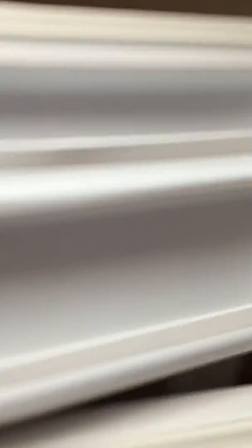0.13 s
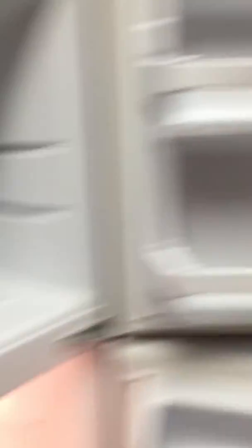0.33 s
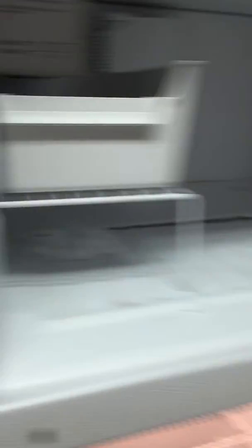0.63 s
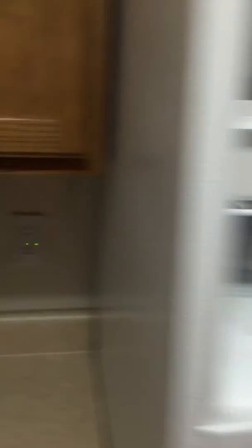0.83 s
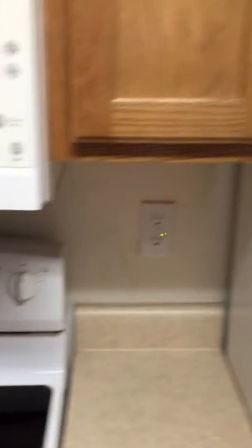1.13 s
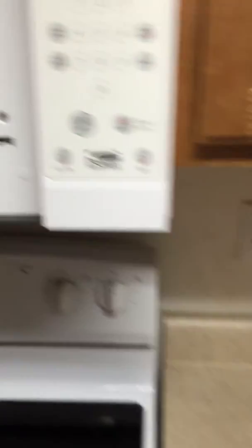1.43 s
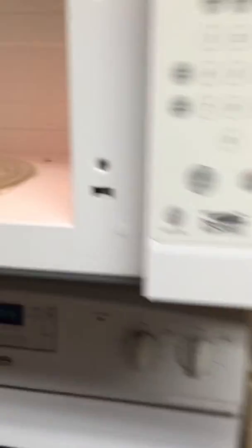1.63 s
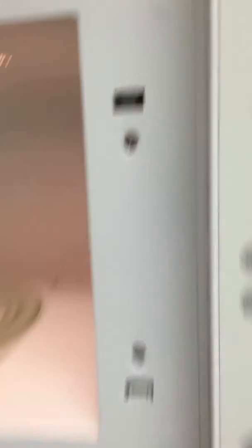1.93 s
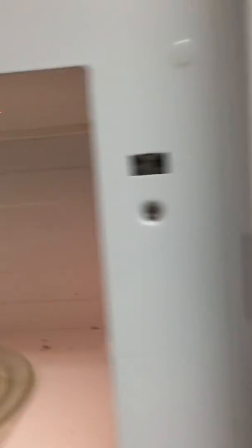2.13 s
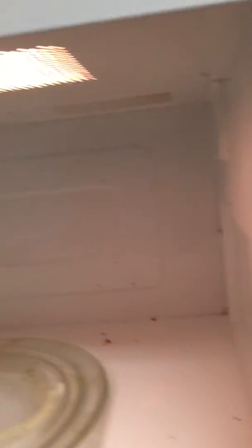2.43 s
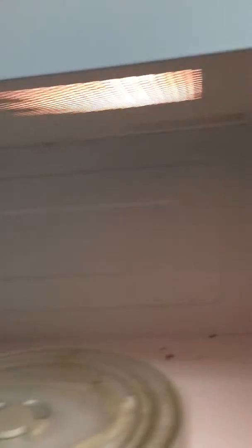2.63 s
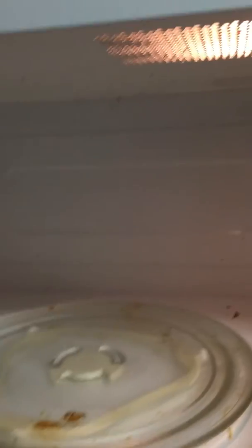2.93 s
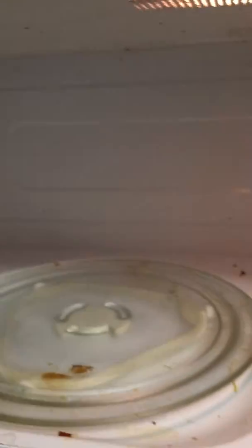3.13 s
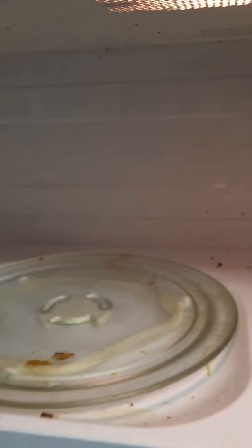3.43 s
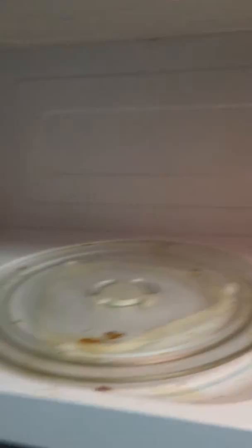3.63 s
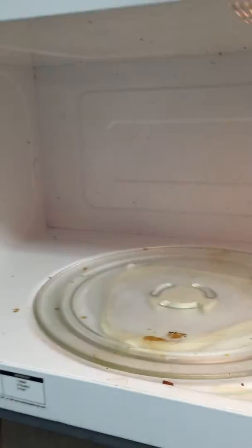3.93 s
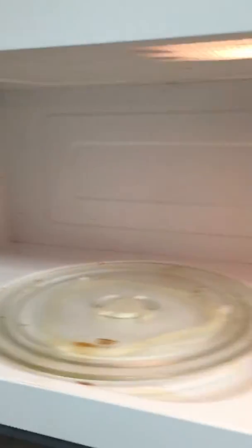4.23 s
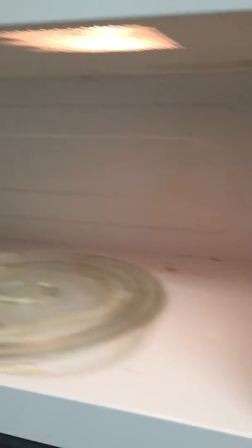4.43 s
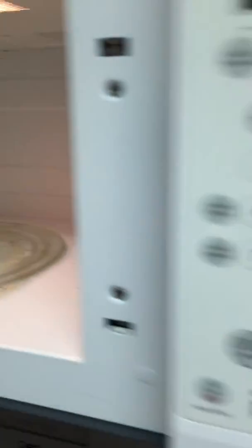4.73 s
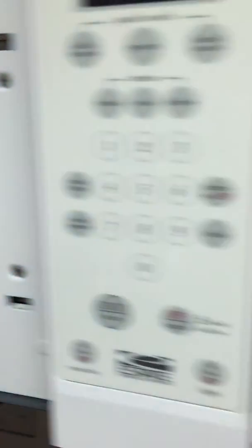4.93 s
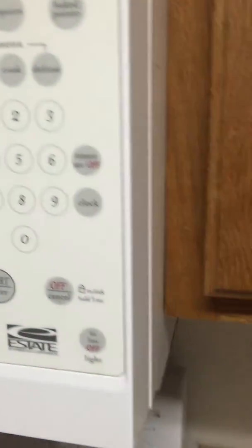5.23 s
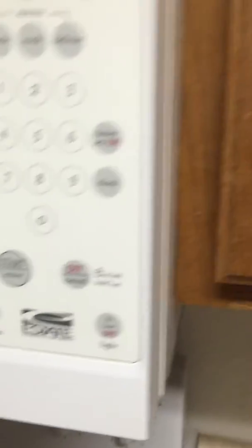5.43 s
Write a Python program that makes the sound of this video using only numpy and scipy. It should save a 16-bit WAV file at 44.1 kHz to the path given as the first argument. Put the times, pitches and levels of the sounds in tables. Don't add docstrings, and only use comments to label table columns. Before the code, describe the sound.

A small handheld microphone moves through a bare, reflective kitchen. At first an open running refrigerator is near: a low, slowly beating compressor hum, hollow drone and breathy fan hiss, with soft floor rumble. At 0.75 s a hollow shelf is knocked and rings briefly; at 0.94 s a heel lands with a sharp click and airy scuff. From about 1.2 s the fan fades. A tiny spring ping and close tick come at 1.6 s, faint squeaks near 1.9 s, a latch snap with quick rebounds at 2.15 s and a duller click at 2.36 s. A toe tap at 2.96 s brings a low floor creak. Quiet hum and muffled treads follow, with a soft heel at 4.78 s. The drone swells near 5.1 s. At 5.33 s the seal touches, then at 5.35 s the door slams extremely loudly, rebounding, with deep thud, panel ring, shelf rattle and short echo.

```python
import sys
import numpy as np
from scipy import signal
from scipy.fft import rfft, irfft
from scipy.io import wavfile
from scipy.ndimage import uniform_filter1d

SR = 44100
rng = np.random.default_rng(int(sys.argv[2]) if len(sys.argv) > 2 else 0)


def store_pcm(level_fs):
    pcm = np.round(np.clip(level_fs, -1, 1) * 32767).astype(np.int16)
    wavfile.write(sys.argv[1], SR, np.atleast_2d(pcm).T)


def convert_level_to_amplitude(level_db):
    exponent = np.asarray(level_db, float) / 20
    return 10 ** exponent


N = 245637

# (frequency [Hz], density [dB per Hz])
STILL = [(240, -25), (400, -10), (432, -4), (459, -16), (481, -9), (527, -10), (673, -1), (726, -1.5),
         (761, -23), (1170, -4.5), (2030, -31.5), (2920, -27), (3250, -25), (5480, -27.5), (15500, -33.5)]
STILL_DB = -66.5
# (frequency [Hz], density [dB per Hz])
FAN = [(240, -22), (400, -14), (438, -7.5), (466, -35), (586, -2), (663, -11.5), (1050, -6), (2090, -10.5),
       (3510, -20.5), (4630, -29.5), (11400, -34.5), (15500, -39)]
# (frequency [Hz], density [dB per Hz])
DRONE = [(76, -25), (130, -9.5), (268, 4), (396, -3.5), (422, -25), (537, -8.5), (602, -19.5), (826, -16.5),
         (907, -12.5), (1060, -15.5), (1600, -24.5), (2080, -48), (3520, -120)]
# (frequency [Hz], density [dB per Hz])
RUMBLE = [(15, -54), (25, -8), (42, -9), (62, -9), (75, -0.5), (124, 3.5), (136, -2), (146, -7), (161, -24),
          (200, -31), (260, -43), (440, -120)]
RUMBLE_DB = -56.5
# (time [s], level over the rest [dB], half length [s])
TREADS = [
    (.05, 10, 0.31),
    (.78, 13, .07),
    (0.933, 9, 0.043),
    (2.05, 4, 0.22),
    (3.067, 5, .1),
    (3.4, 12.5, .12),
    (4.78, 9.5, .06),
    (5.04, 10, 0.054),
    (5.3, 5, .08),
]
# (time [s], drone level by nearness [dB], fan level by view into the open door [dB])
WALK = [(0.0, -52.5, -54.5), (0.25, -51, -54.5), (0.53, -48, -51.5), (0.83, -47.5, -50), (1.26, -50.5, -59),
        (1.48, -54, -62), (1.72, -54.5, -62.5), (2.09, -54, -64.5), (2.55, -58.5, -68),
        (3.01, -59.5, -67.5), (3.96, -60.5, -66), (4.42, -57.5, -66), (5.07, -50.5, -65.5),
        (5.32, -53, -63)]

# (frequency [Hz], level [dB])
HUM = [(54.1, 0.5), (59.0, 5), (108.3, -2.5), (119.9, 0)]
HUM_DB, HUM_FOLLOWS, NEAR_DB = -55.5, 0.54, -50.5
BEAT_S, CREST_S = 0.58, 0.3
NODES_S = 2.4
SHAFT_HZ = 54.43
# (order [1], level against the drone [dB])
SHAFT_ORDERS = [(3, -14), (4, -8), (5, -3.5), (7, -13.5), (8, -12.5), (9, -13), (10, -15.5), (12, -30)]
# (frequency [Hz], width [Hz], level [dB], loudest at [s], span [s])
RESONANCES = [(1057, 16, -73, 1.6, 1.1), (661, 21, -71, 2.11, 0.37), (431.2, 6.6, -68, 0.28, 0.89),
              (5500, 110, -94.5, 2, 5.9),
              (82.4, 6, -64.5, 2.93, 0.64), (191, 73, -65.5, 0.59, 1), (121, 26, -73, 3.8, 0.41),
            (225.2, 10.3, -67.5, 1.55, 0.88), (380.4, 21, -71.5, 3.3, 0.75)]
WALL_S, WALL_SWAY_S, WALL_SHARE = 0.0011, 0.0003, 0.2

# (frequency [Hz], t60 [s])
KITCHEN = [(100, 0.98), (300, 0.68), (1000, 0.42), (3000, 0.37), (8000, 0.33), (15000, 0.28)]

# (time [s], level [dB])
SNAPS = [
    (.939, -52),
    (1.595, -62),
    (2.146, -55),
    (2.361, -63),
    (2.955, -54),
]
# (frequency [Hz], level [dB])
SNAP = [(500, -30), (800, 0), (3000, 3), (8000, -6), (15000, -3)]
# (frequency [Hz], level [dB], t60 [s])
SHELF = [(217, -7.5, .2), (289, -9.5, 0.17), (374.6, -1.5, 0.52), (442, -1, 0.094), (546, -5, 0.085),
         (698, -6.5, 0.15), (766, -8, 0.14)]
SHELF_S, SHELF_DB = 0.746, -26
SHELF_FREE_S, SHELF_MUTE_S = 0.054, 0.012
# (frequency [Hz], level [dB], t60 [s])
STEP = [(231.5, 7.5, 0.12), (210, 5, 0.13), (172, -0.5, 0.26)]
STEP_S, STEP_DB = 2.958, -36
CONTACT_S = 0.0006

# (frequency [Hz], level [dB], t60 [s], spread [octaves], room level [dB])
SHELF_EDGE = [(2337, -2, 0.03, 0.19, -13.5), (4200, -14, 0.035, 0.61, -6.5), (1190, -10.5, 0.069, 0.9, -4),
              (10300, -25.5, 0.058, 0.54, -9)]
HEEL = [(1346, -5, 0.024, 0.1, -9), (1735, -1, 0.015, 0.15, -12), (2450, -0.5, 0.016, 0.12, -10),
        (3820, -14.5, 0.014, 0.1, -7)]
LATCH = [(1710, 0.5, 0.033, 0.5, -1), (2390, -5.5, 0.027, 0.29, -7), (3320, -10.5, 0.073, 0.4, 2),
         (6400, -16, 0.036, 0.47, 2)]
SPRING = [(4370, 0, 0.023, 0.089, -8), (6200, -11, .03, .25, -1), (1510, 6, .03, .1, -5)]
TOE = [(1730, 1, 0.038, 0.23, -6.5), (2160, -3.5, 0.038, 0.23, -13), (3460, -9, 0.065, 0.17, -15),
       (5640, -11.5, 0.049, 0.19, -12), (840, -11, 0.052, 0.31, -15)]
TICK = [(2050, 0, .011, .06, -9), (1625, -7, .015, .1, -8)]
# (time [s], level [dB], pitch factor [1], extra room level [dB], dullness [dB per octave])
SHELF_EDGE_AT = [
    (.7440, -15.5, 1.0, 0.8, 0.5),
]
HEEL_AT = [
    (.9385, -20, 0.99, -0.82, 0.033),
    (4.7805, -39.5, .95, 1.7, 1),
]
LATCH_AT = [
    (2.1453, -32, 0.97, -0.12, 0.5),
    (2.151, -38, 1.08, 0.1, 1.5),
    (2.163, -41.5, 1.15, 0.1, 0.5),
    (2.360, -44, 0.96, -1.8, 3.4),
]
SPRING_AT = [
    (1.593, -53, .99, -2, -1.5),
    (2.109, -46.5, 1.01, -1, 0.033),
]
TOE_AT = [
    (2.9555, -34, 0.99, 0.1, 0.1),
]
TICK_AT = [
    (1.6258, -30.5, 1, -4, 0),
]
# (time [s], level [dB], frequency [Hz], t60 [s], spread [octaves])
SCUFFS = [
    (.947, -51.5, 8200, 0.25, 1),
    (1.17, -59, 2690, .4, 0.2),
    (1.845, -61, 2880, .21, .2),
    (1.885, -61.5, 2100, .18, 0),
    (2.95, -47.5, 1380, 0.073, 1),
    (3.097, -55, 1160, .042, .1),
    (4.781, -46.5, 648, 0.15, .51),
    (5.05, -63, 2020, .15, 0.5),
]
SCUFF_ROOM_DB = -7
# (time [s], level [dB], frequency [Hz], t60 [s], spread [octaves])
CREAKS = [
    (3.016, -40, 161, 0.35, .33),
    (3.05, -41.5, 154.3, 0.37, 0.0047),
]

# (time [s], level [dB], t60 [s], dullness [dB per octave])
TOUCHES = [
    (5.3327, -19.5, 0.084, 2),
    (5.342, -16, 0.039, 0.5),
    (5.35, -12, 0.069, 0.5),
    (5.3539, -1, 0.025, 0.5),
    (5.3634, -6.5, 0.025, 1.5),
    (5.372, -7, 0.066, -1.5),
    (5.389, -23, 0.061, -2),
    (5.435, -24.5, 0.11, -2),
    (5.358, -20, 0.34, -1),
]
# (frequency [Hz], density [dB per Hz])
RATTLE = [(180, -22), (300, 0.5), (511, -10), (667, -2.5), (1060, -8), (1250, -3), (1530, -7), (1660, -3.5),
          (2980, -12.5), (4370, -12), (4830, -13.5), (6850, -16), (7820, -18.5), (14700, -26.5),
          (16000, -36)]
# (frequency [Hz], level [dB], t60 [s])
CABINET = [(45, -8, 0.3), (67.6, 3, 0.25), (86, 0.5, 0.15), (101, 5, 0.14), (113.2, -2, 0.29),
           (129.9, -5.5, 0.7), (167.3, -2.5, 0.45), (183, 2, 0.35), (204, 2.5, 0.21), (243.4, -9, 0.4),
           (274.5, -2, 0.374), (346, -9.5, 0.33), (378.6, -14.5, 0.29), (399, -10, 0.23)]
# (frequency [Hz], level [dB], t60 [s])
PANEL = [(643, -7.5, 0.2), (708, -10.5, 0.18), (982, -9, 0.28), (1270, -25, 0.28), (1354, 8, 0.04),
         (1413, -5, 0.13), (1414, 0, 0.043), (1674, -2, 0.082), (1910, 3, 0.054), (2035, 1.5, .08),
         (2655, -4, 0.062), (4160, -6, 0.042), (5310, 1, 0.039)]
# (frequency [Hz], level [dB])
THUD = [(35, -42), (52, -12), (72, 4), (110, 3.5), (210, 2), (320, -20), (500, -24), (1000, -50)]
BLOW_S, BOOM_S, CABINET_DB, PANEL_DB = 5.3505, 5.356, -11.5, -14


def evened(x):
    return x / np.sqrt(np.mean(x ** 2) + 1e-20)


def read(points, hz):
    f, value = np.transpose(points)
    return np.interp(np.log(hz + 1), np.log(f + 1), value)


def add(mix, s, sound):
    part = mix[round(s * SR):][:len(sound)]
    part += sound[:len(part)]


def wander(hz):
    t = np.arange(0, N, 256) / SR
    rows = rng.random((16, 2))
    slow = sum(np.sin(2 * np.pi * (hz * f * t + phase)) for f, phase in rows)
    return np.interp(np.arange(N) / SR, t, evened(slow))


def noise(spectrum, patchy_db, size):
    hz = np.fft.rfftfreq(size, 1 / SR)
    a, b, patches = rng.standard_normal((N * 4 // size + 5, len(hz), 3)).T
    patches = uniform_filter1d(patches, size=8, axis=0)
    patches = evened(uniform_filter1d(patches, size=6, axis=1))
    z = (a + 1j * b) * convert_level_to_amplitude(read(spectrum, hz)[:, None] + patchy_db * patches)
    return evened(signal.istft(z, nperseg=size, noverlap=size * 3 // 4)[1][:N])


def burst(spectrum, t60, tilt_db=0., rise_s=0.00079):
    t = np.arange(SR // 2) / SR
    hz = np.fft.rfftfreq(len(t), 1 / SR)
    colour = convert_level_to_amplitude(read(spectrum, hz) + tilt_db * np.log2((hz + 50) / 2000))
    puff = evened(irfft(rfft(rng.standard_normal(len(t))) * colour))
    return puff * convert_level_to_amplitude(-60 * t / t60) * (1 - np.exp(-t / rise_s))


def ring(modes, rise_s):
    t = np.arange(SR // 2) / SR
    tones = sum(convert_level_to_amplitude(db - 60 * t / t60) * np.sin(2 * np.pi * hz * t) for hz, db, t60 in modes)
    return tones * (1 - np.exp(-t / rise_s))


def kitchen(x, spread=0.71):
    taps = np.zeros(SR)
    at = np.arange(200, SR - 20, 20) + rng.integers(0, 20, (SR - 201) // 20)
    taps[at] = rng.choice([-1., 1.], len(at))
    hz, t, z = signal.stft(taps, SR, nperseg=256)
    t60 = spread * read(KITCHEN, hz)
    tail = signal.istft(z * convert_level_to_amplitude(-60 * t / t60[:, None]), SR, nperseg=256)[1]
    return signal.fftconvolve(x, tail / np.linalg.norm(tail))[:N]


def still_house():
    t = np.arange(N) / SR
    swell = sum(db * np.exp(-((t - s) / half) ** 2) for s, db, half in TREADS)
    rumble = convert_level_to_amplitude(RUMBLE_DB + swell - 4.5) * noise(RUMBLE, 1.2, size=4096)
    return rumble + convert_level_to_amplitude(STILL_DB) * noise(STILL, 0.41, size=1024)


def fan_air(fan_db):
    t = np.arange(N) / SR
    fan = noise(FAN, 1.94, size=512)
    reflected = np.interp(t - WALL_S - WALL_SWAY_S * wander(1.3), t, fan)
    return convert_level_to_amplitude(fan_db - 0.54) * (fan + WALL_SHARE * reflected)


def compressor(drone_db):
    t = np.arange(N) / SR
    tones = [convert_level_to_amplitude(db) * np.cos(2 * np.pi * hz * (t - BEAT_S) + 0.15 * wander(1.18)) for hz, db in HUM]
    node_crossing = np.cos(np.pi * (t - CREST_S) / NODES_S)
    hum = tones[0] + node_crossing * tones[1] + sum(tones[2:])
    orders = np.zeros(N)
    for k, db in SHAFT_ORDERS:
        phase = 2 * np.pi * k * SHAFT_HZ * t + 0.31 * wander(1.16)
        orders += convert_level_to_amplitude(db + 1.9 * wander(0.764)) * np.sin(phase)
    hum_db = HUM_DB + HUM_FOLLOWS * (drone_db - NEAR_DB)
    return convert_level_to_amplitude(hum_db) * hum + convert_level_to_amplitude(drone_db) * orders


def resonances():
    t = np.arange(N) / SR
    out = np.zeros(N)
    for hz, width, db, s, span in RESONANCES:
        near_db = 9.2 * np.exp(-((t - s) / span) ** 2)
        band = signal.lfilter(*signal.iirpeak(hz, hz / width, SR), rng.standard_normal(N))
        out += convert_level_to_amplitude(db + near_db) * evened(band)
    return out


def fridge():
    s, *columns = np.transpose(WALK)
    drone_db, fan_db = (np.interp(np.arange(N) / SR, s, c) for c in columns)
    drone = convert_level_to_amplitude(drone_db - 1.5) * noise(DRONE, 1.96, size=2048)
    return fan_air(fan_db) + drone + compressor(drone_db) + resonances()


def contacts():
    struck = [(SHELF_EDGE, SHELF_EDGE_AT), (HEEL, HEEL_AT), (LATCH, LATCH_AT),
              (TOE, TOE_AT), (TICK, TICK_AT), (SPRING, SPRING_AT)]
    parts = []  # (time [s], level [dB], frequency [Hz], t60 [s], spread [octaves], room level [dB])
    for thing, times in struck:
        for s, db, pitch, far_db, dull_db in times:
            for hz, part_db, t60, spread, room_db in thing:
                level = db + part_db - dull_db * np.log2(hz / 2000)
                parts.append((s, level, pitch * hz, t60, spread, room_db + far_db))
    scuffs = [(*row, SCUFF_ROOM_DB) for row in SCUFFS]
    return parts + scuffs + [(*row, -30) for row in CREAKS]


def clicks():
    direct, sent = np.zeros(N), np.zeros(N)
    for s, db, hz, t60, spread, room_db in contacts():
        share = np.clip(2 * spread, 0, 1)
        wide = 2 ** (abs(spread) + 0.025)
        rise_s = CONTACT_S + 0.004 * t60
        band = [(hz / wide ** 4, -60), (hz / wide, -8), (hz, 0), (hz * wide, -8), (hz * wide ** 4, -60)]
        crack = burst(band, t60, rise_s=rise_s)
        click = (1 - share) * ring([(hz, 0, t60)], rise_s) + 0.9 * share * crack
        add(direct, s, convert_level_to_amplitude(db) * click)
        broad = [(hz / 7.2, -60), (hz / 1.77, -8), (hz, 0), (hz * 1.28, -8), (hz * 4, -60)]
        add(sent, s, convert_level_to_amplitude(db + room_db) * (0.22 * click + 0.91 * burst(broad, 0.031)))
    for s, db in SNAPS:
        add(direct, s, convert_level_to_amplitude(db) * burst(SNAP, 0.038))
    t = np.arange(SR // 2) / SR
    held = np.exp(-np.maximum(t - SHELF_FREE_S, 0) / SHELF_MUTE_S)
    add(direct, SHELF_S, convert_level_to_amplitude(SHELF_DB) * held * ring(SHELF, 0.0014))
    add(direct, STEP_S, convert_level_to_amplitude(STEP_DB) * ring(STEP, 0.012))
    return direct + kitchen(sent)


def slam():
    rattle, body = np.zeros(N), np.zeros(N)
    for s, db, t60, tilt_db in TOUCHES:
        add(rattle, s, convert_level_to_amplitude(db) * burst(RATTLE, t60, tilt_db, rise_s=0.00085))
    add(rattle, BLOW_S, convert_level_to_amplitude(PANEL_DB) * ring(PANEL, 0.00093))
    add(body, BOOM_S, convert_level_to_amplitude(CABINET_DB) * ring(CABINET, 0.0031))
    add(body, BOOM_S, convert_level_to_amplitude(-16) * burst(THUD, 0.17, rise_s=0.0027))
    add(body, BOOM_S, convert_level_to_amplitude(-14) * burst(THUD, 0.58, rise_s=0.0065))
    add(body, TOUCHES[0][0], convert_level_to_amplitude(-27.5) * burst(THUD, 0.15, 2.8, rise_s=0.0063))
    return rattle + body + kitchen(convert_level_to_amplitude(-10) * rattle + convert_level_to_amplitude(-26) * body, spread=1.07)


def scene():
    return (still_house() + fridge() + clicks() + slam())[None]


def roll_off(x):
    return signal.sosfilt(signal.butter(12, 16460, fs=SR, output="sos"), x)


def record(dry):
    x = signal.sosfilt(signal.butter(4, 38, "high", fs=SR, output="sos"), dry)
    x = 0.58 * x + 0.37 * signal.lfilter(*signal.iirnotch(10500, 12, SR), x)
    ceiling = 0.7
    x = x / (1 + abs(x / ceiling) ** 8) ** (1 / 8)
    lowpass = signal.firwin(255, 15450, window=("kaiser", 8), fs=SR)
    padded = np.pad(x, ((0, 0), (127, 127)), "reflect")
    mix = signal.oaconvolve(padded, lowpass[None], "valid")
    return roll_off(mix)


dry = scene()
out = record(dry)
store_pcm(out)
```